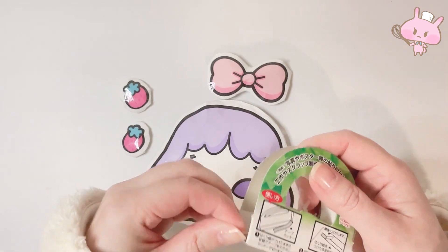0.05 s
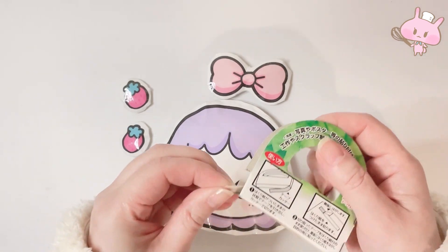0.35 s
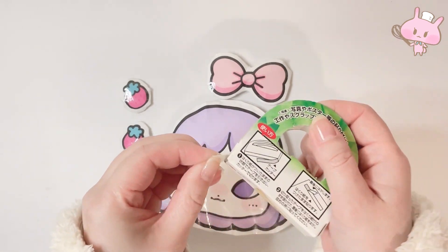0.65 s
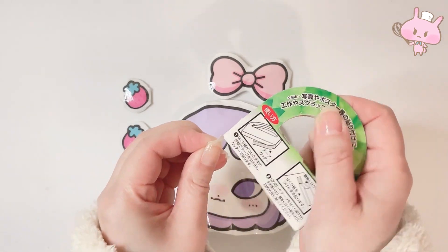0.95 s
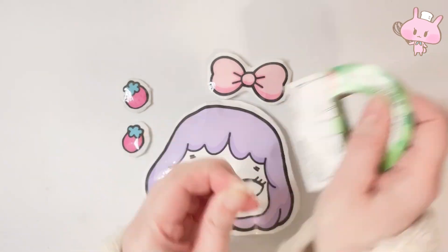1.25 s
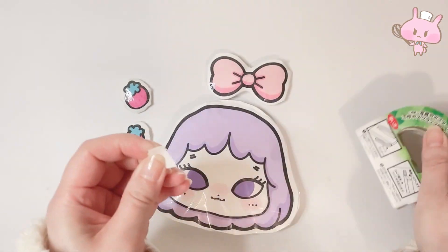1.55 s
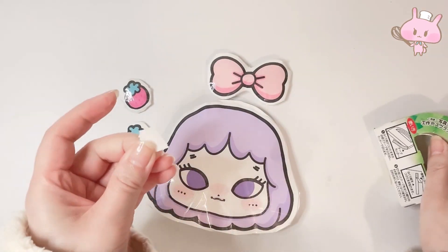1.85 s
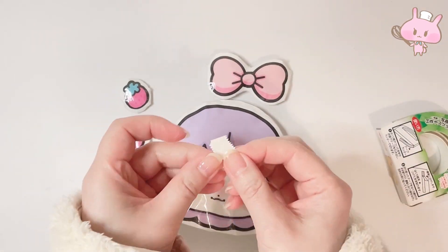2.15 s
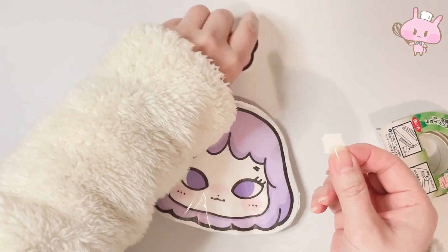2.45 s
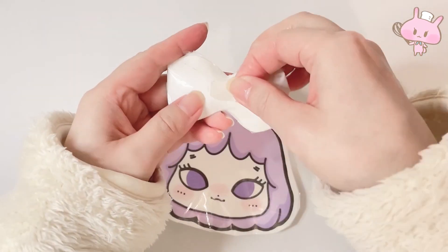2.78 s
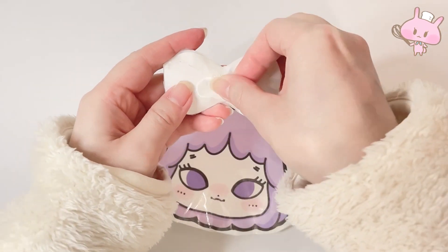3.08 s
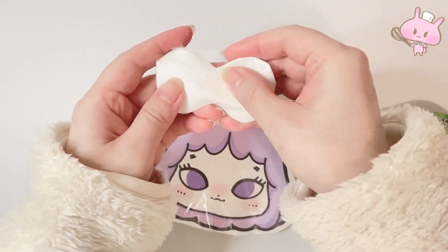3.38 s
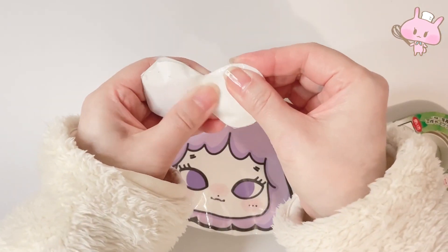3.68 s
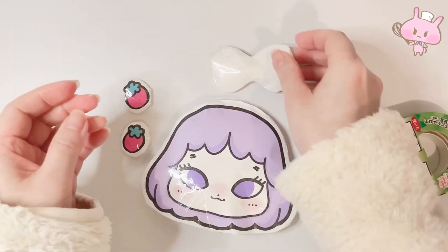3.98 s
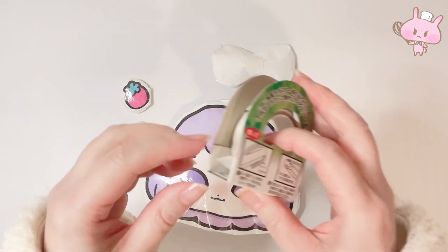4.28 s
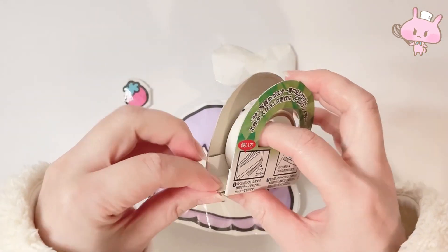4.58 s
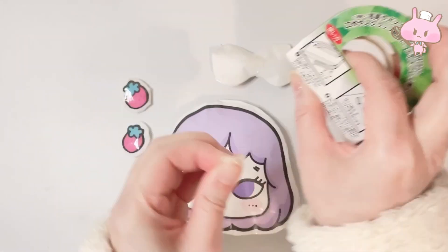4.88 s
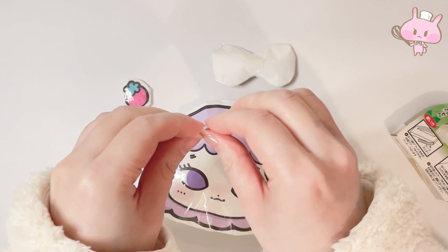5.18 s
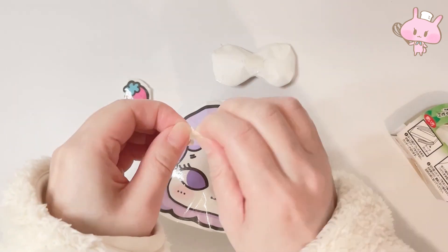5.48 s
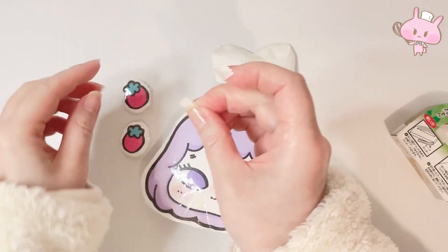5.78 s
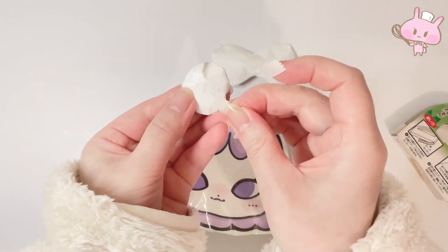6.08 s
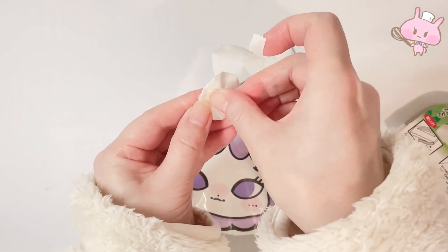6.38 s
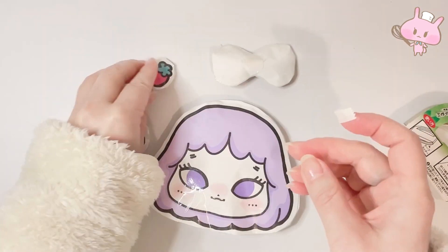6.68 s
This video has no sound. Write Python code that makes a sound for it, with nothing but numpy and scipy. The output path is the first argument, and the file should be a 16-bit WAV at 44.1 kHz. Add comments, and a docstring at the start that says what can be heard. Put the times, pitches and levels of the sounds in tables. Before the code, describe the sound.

Close up in a small, quiet room, clear tape peels off its reel with short squeaks and ticks during the first second, over a faint, low throbbing hum. At about 1.2 seconds it tears across the teeth of a plastic dispenser with a hard snap, the loudest sound, and the shell rings briefly. The dispenser scrapes and clacks onto the table around 1.6 seconds; the hum stops just before 2. Fingers tap and rustle a paper cut-out near 2.5 seconds, followed by sparse, faint crinkles and dull brushes of sleeves and wrists. From about 4.2 seconds the dispenser is handled again and a second strip rasps out in small jerks, tearing off more lightly near 4.9. A few plastic clicks follow. From 6 seconds the paper rustles and ticks as it is taped, then it is laid back and softly patted down near 6.9.

```python
"""Crafting at a table, close up. Over a low throbbing hum, clear tape sticks and slips off its reel,
then snaps hard across the teeth of a plastic dispenser, whose shell rings. The dispenser clacks down,
the hum stops just before two seconds, and the small room is very quiet. Paper cut-outs rustle and
tick as they are picked up. A second strip rasps out and tears off lightly near five seconds; the
paper is taped, laid back and patted down."""
import sys
import numpy as np
from scipy import signal
from scipy.fft import rfft, irfft
from scipy.io import wavfile

SR = 44100
rng = np.random.default_rng(int(sys.argv[2]) if len(sys.argv) > 2 else 0)


def generate_wav(signal):
    """Clip the signal to [-1, 1] and save it as 16-bit WAV at the path in sys.argv[1]."""
    frames = np.transpose(np.atleast_2d(signal))
    scaled = np.clip(frames, -1, 1) * 32767
    pcm = np.round(scaled).astype(np.int16)
    wavfile.write(sys.argv[1], SR, pcm)


N = 306054
TIME = np.arange(N) / SR
STROKE_RISE = .42  # share of a stroke's length spent swelling


def amp(db):
    """Decibels to gain."""
    return 10 ** (np.asarray(db) / 20)


def unit(x):
    """Scales to an rms of one."""
    return x / np.sqrt(np.mean(x ** 2) + 1e-20)


def curve_at(points, hz):
    """Joins (hz, value) points on a log-frequency axis."""
    point_hz, value = np.transpose(points)
    return np.interp(np.log(hz + 1), np.log(point_hz + 1), value)


def fader(points):
    """Rides a level through (time_s, level_db) points."""
    return np.interp(TIME, *np.transpose(points))


def add(mix, start_s, sound):
    """Lays a sound into the mix."""
    start = round(start_s * SR)
    sound = sound[max(-start, 0):]
    part = mix[max(start, 0):][:len(sound)]
    part += sound[:len(part)]


def eq_response(spectrum, peaks=(), tone=None, size=4096):
    """Minimum-phase impulse response of an EQ curve, with resonant peaks and a broad tone on top."""
    hz = abs(np.fft.fftfreq(size, 1 / SR))
    db = curve_at(spectrum, hz)
    db += sum(gain_db / (1 + (2 * (hz - centre) / width) ** 2) for centre, width, gain_db in peaks)
    if tone is not None:
        db += curve_at(tone, hz)
    log_gain = np.log(amp(db) + 1e-6)
    return np.fft.ifft(np.exp(np.conj(signal.hilbert(log_gain)))).real


def coloured(x, spectrum, peaks=()):
    """Gives white sound a spectrum and keeps its power."""
    impulse = eq_response(spectrum, peaks)
    return signal.oaconvolve(x, impulse / np.linalg.norm(impulse))[:N]


def drift(top_hz):
    """Slow random wander of rms one."""
    rates = np.geomspace(top_hz / 10, top_hz, 20)
    t = TIME[::100]
    wander = np.sin(2 * np.pi * (rates[:, None] * t + rng.random((20, 1)))).sum(0)
    return unit(np.interp(TIME, t, wander))


def swelling(rise_s, fall_s):
    """Times around a peak, and a gain that grows to it and dies away."""
    t = np.arange(-5 * rise_s, 6 * fall_s, 1 / SR)
    return t, np.exp(np.where(t < 0, t / rise_s, -t / fall_s))


def slips(samples, per_s, spread_db, hiss):
    """Stick and slip: tiny clicks of uneven size over a smooth hiss."""
    size, chance = rng.random((2, samples))
    sign = rng.choice([-1, 1], samples)
    click_db = -spread_db * np.log(np.maximum(size, .02))
    clicks = sign * amp(click_db) * (chance < per_s / SR)
    return unit(unit(clicks) + hiss * rng.standard_normal(samples))


def burst(peak_s, rise_s, fall_s, db, grain):
    """Start time and sound of a swelling run of slips; grain is (per_s, spread_db, hiss)."""
    t, swell = swelling(rise_s, fall_s)
    friction = unit(swell * slips(len(t), *grain))
    return peak_s + t[0], amp(db) * friction * np.sqrt(np.mean(swell ** 2))


def strokes(rows, spectrum, peaks, grain, ring_db, ring_q, bass_db, mid_db, bass_tilt, mid_tilt,
            rise_share=STROKE_RISE):
    """Each touch excites the material and one resonance; the tilts give duller touches more body."""
    out = np.zeros(N)
    for peak_s, length_s, db, bright_db, ring_hz in rows:
        tone = [(420, bass_db - bass_tilt * bright_db), (1300, mid_db - mid_tilt * bright_db),
                (3500, 0.0022), (9000, bright_db)]
        ring = (ring_hz, ring_hz / ring_q, ring_db)
        start_s, slip = burst(peak_s, rise_share * length_s, (1 - rise_share) * length_s, db, grain)
        add(out, start_s, signal.fftconvolve(slip, eq_response(spectrum, [*peaks, ring], tone)))
    return out


# room tone EQ: freq_hz, gain_db
AIR_EQ = [(12, -39.5), (20, -5.5), (86, -3.5), (142, 1.5), (210, -2.5), (357, -13), (624, -12.5),
          (1530, -20), (2600, -24), (3840, -34.5), (9400, -52.5), (11400, -39), (13500, -50.5),
          (14700, -40.5), (16000, -43.5)]
# faint resonances in the air: pitch_hz, width_hz, gain_db
AIR_PEAKS = [(748, 24, 2.5), (2580, 130, 6)]
def air(level_db=-64.66):
    """The still air of the room: a steady bed of dark noise."""
    return amp(level_db) * coloured(rng.standard_normal(N), AIR_EQ, AIR_PEAKS)


# reverb time: freq_hz, t60_s
ROOM_DECAY = [(200, 0.22), (1500, 0.22), (5000, 0.19), (14000, .16)]
def room(send, predelay_s=0.0044):
    """A small room: dense reflections, the treble dying first."""
    hz, t, noise = signal.stft(rng.standard_normal(SR // 2), SR, nperseg=256)
    decay = 1e-3 ** (t / curve_at(ROOM_DECAY, hz)[:, None])
    tail = signal.istft(noise * decay, SR, nperseg=256)[1]
    tail = np.r_[np.zeros(round(predelay_s * SR)), tail]
    return signal.fftconvolve(send, tail / np.linalg.norm(tail))[:N]


# fader ride of the drone: time_s, level_db
HUM_RIDE = [(0, -50), (.58, -45.5), (.88, -49.5), (1.1, -45), (1.62, -45), (1.75, -40), (1.9, -55)]
# its partials: pitch_hz, gain_db
HUM_PARTIALS = [(55, 2.5), (82, -16), (162, -15.5), (205, -20.5)]
# EQ of the rumble around it: freq_hz, gain_db
RUMBLE_EQ = [(20, -30), (42, -4), (60, 6), (100, -7), (170, -7), (300, -18), (600, -29), (1500, -27),
             (4000, -41), (16000, -68)]
def hum(throb_hz=6.15, throb_db=3.5, crest_s=.115, flutter_db=1.84, waver=0.039,
        trim_db=-1, rumble_db=-52, end_s=1.88, fade_s=0.0077):
    """A throbbing, wavering low drone in a bed of rumble that stops together with it."""
    partials = np.zeros(N)
    for hz, db in HUM_PARTIALS:
        gain = amp(db + flutter_db * drift(7.1))
        pitch_hz = hz * (1 + waver * drift(9.9))
        partials += gain * np.sin(2 * np.pi * np.cumsum(pitch_hz) / SR)
    throb = np.cos(2 * np.pi * throb_hz * (TIME - crest_s))
    drone = amp(fader(HUM_RIDE) + throb_db * throb + trim_db) * unit(partials)
    rumble = amp(rumble_db) * coloured(rng.standard_normal(N), RUMBLE_EQ)
    return (drone + rumble) * np.clip((end_s - TIME) / fade_s, 0, 1)


# fader ride of the forearms: time_s, level_db
ARMS_RIDE = [(0, -79.5), (1.7, -61), (1.92, -58.5), (2.8, -63), (4.6, -62), (6.1, -74), (6.94, -64)]
# their bass-heavy EQ: freq_hz, gain_db
ARMS_EQ = [(20, -12.5), (55, 1.5), (95, -6.5), (135, 2), (240, -6.5), (380, -22.5), (700, -19), (1500, -27),
           (16000, -66.5)]
def arms(lumps_db=2):
    """Sleeved forearms drag on the table in dull lumps."""
    level_db = fader(ARMS_RIDE) + lumps_db * drift(14)
    return amp(level_db) * coloured(rng.standard_normal(N), ARMS_EQ)


# fader ride of fingers and sleeves: time_s, level_db
BRUSH_RIDE = [(0.0, -77.5), (0.23, -74.5), (0.67, -74), (1.1, -66.5), (1.55, -64.5), (1.64, -66),
              (1.97, -81.5), (3.77, -77.5), (4.62, -76), (5.18, -82), (6.38, -81), (6.94, -77)]
# their mid-forward EQ: freq_hz, gain_db
BRUSH_EQ = [(300, -3), (900, 3), (1600, 5.5), (2400, 0), (4000, -0.5), (9000, -6.5), (11500, -8.5),
            (13000, -14.5), (15500, -9.5)]
def brushing(flutter_db=2, trim_db=1):
    """Faint uneven friction of skin and fleece."""
    level_db = fader(BRUSH_RIDE) + trim_db + flutter_db * drift(30)
    return amp(level_db) * coloured(slips(N, per_s=820, spread_db=3, hiss=1.0), BRUSH_EQ)


# the dispenser's recoil, then the table's boom once it is down: start_s, level_db, pitch_hz, decay_s
RECOIL_AND_BOOM = [(1.222, -37, 270.6, 0.0166), (1.235, -30, 308.6, 0.0105), (1.2362, -15.5, 798, 0.00453),
                   (1.985, -47, 129.9, 0.1)]
# fingers patting a cut-out onto the table: start_s, level_db
FINGER_PATS = [(2.419, -35.5), (2.457, -27.5), (2.478, -32), (2.505, -30), (2.517, -23.5), (2.523, -31),
               (5.957, -42), (6.904, -35.5)]
# wrists landing on the table: start_s, level_db
WRIST_THUMPS = [(2.222, -43), (3.86, -45.5), (4.044, -40.5), (4.25, -48), (4.746, -43.5), (5.275, -47.5),
                (6.472, -47)]
def bumps(attack_s=0.002081, pat_hz=381, pat_decay_s=0.0073, thump_hz=73, thump_decay_s=0.013):
    """Soft contacts and recoils give a few low, damped swings."""
    t, out = np.arange(SR // 4) / SR, np.zeros(N)
    pats = [(start_s, db, pat_hz, pat_decay_s) for start_s, db in FINGER_PATS]
    thumps = [(start_s, db, thump_hz, thump_decay_s) for start_s, db in WRIST_THUMPS]
    for start_s, db, hz, decay_s in RECOIL_AND_BOOM + pats + thumps:
        envelope = (1 - np.exp(-t / attack_s)) * np.exp(-t / decay_s)
        add(out, start_s, amp(db) * envelope * np.sin(2 * np.pi * hz * t))
    return out


# EQ of friction on paper: freq_hz, gain_db
PAPER_EQ = [(100, -15.5), (350, -5.5), (5000, -2.5), (11300, -11.5), (12500, -18.5), (15500, -14.5)]
# paper moves: peak_s, length_s, level_db, brightness_db, ring_hz
PAPER_RUSTLES = [(1.936, 0.0098, -35, -7, 1156), (1.949, .012, -37, -8, 1000),
                 (2.421, .012, -43, -12, 3400), (2.436, .022, -46, -14, 3400),
                 (2.485, 0.065, -43.5, -15.5, 975), (2.528, .02, -42.5, -22, 554),
                 (2.618, 0.024, -54, 5.5, 5150), (2.734, .01, -57.5, 4, 2743),
                 (3.254, .017, -53.5, 3.5, 1020), (3.455, 0.043, -63.5, 6.5, 4480),
                 (3.535, .018, -63, 5, 1560), (3.84, .026, -58, 5, 1053), (3.945, 0.016, -59, -4, 3500),
                 (4.083, 0.018, -59, 0, 1072), (5.397, 0.019, -62, 4.5, 2140), (5.58, .016, -55, 15, 11200),
                 (5.965, .025, -40, -12.5, 1040), (6.364, 0.019, -45, 0.5, 1970),
                 (6.493, .022, -56.5, 10.5, 3330), (6.724, .02, -48.5, -9, 3230),
                 (6.767, .026, -45.5, -6, 3140), (6.886, 0.036, -54.5, -21, 4250)]
def rustles():
    """Paper and loose tape slide under the fingers in short, grainy swells."""
    return strokes(PAPER_RUSTLES, PAPER_EQ, (), grain=(1800, 3, .9), ring_db=9, ring_q=4.9,
                   bass_db=8.5, mid_db=2, bass_tilt=0.8, mid_tilt=0.037)


# crisp paper and tape ticks: peak_s, level_db, brightness_db, ring_hz
PAPER_TICKS = [(0.7549, -43.5, 17.5, 1637), (1.0397, -42, 11, 5400), (1.4962, -41, 9.5, 1070),
               (1.539, -35.5, -6, 3700), (1.742, -41, 14.5, 6550), (2.4569, -34.5, -11, 3345),
               (3.229, -41.5, -5.5, 1039), (3.494, -48.5, 3, 5070), (3.577, -54, -8, 1420),
               (3.882, -48, -7.5, 2500), (4.012, -57, 9, 2330), (4.083, -49.5, -7, 1137),
               (4.376, -43.5, -7, 2440), (4.434, -48.5, 6, 1587), (4.511, -46.5, 3, 7400),
               (5.355, -54, -4, 2651), (6.3632, -37.5, 0, 1990), (6.4981, -43, 11, 3350),
               (6.723, -37, -14.5, 3160), (6.7738, -31, -7, 3270)]
def ticks(length_s=0.0019, faint_db=-57.5, spread_db=5, low_hz=1000, high_hz=5000):
    """Creases pop and tape lets go of a fingertip; fainter ticks fall by chance in the second half."""
    faint = []
    for when, size, pitch in rng.random((9, 3)):
        peak_s = np.interp(when, (0, 1), (3.4, 7.7))  # some may fall past the end
        db = faint_db + spread_db * (2 * size - 1)
        faint.append((peak_s, db, 0, low_hz * (high_hz / low_hz) ** pitch))
    rows = [(peak_s, length_s, *voice) for peak_s, *voice in PAPER_TICKS + faint]
    return strokes(rows, PAPER_EQ, (), grain=(8000, 3, .7), ring_db=8.5, ring_q=6.7,
                   bass_db=3.5, mid_db=2, bass_tilt=.4, mid_tilt=0.16, rise_share=.13)


# EQ of friction on the dispenser: freq_hz, gain_db
PLASTIC_EQ = [(100, -7.5), (350, -8.5), (5000, -3), (11300, -9), (12500, -19.5), (15500, -12.5)]
# its resonances, damped by the hand: pitch_hz, width_hz, gain_db
HELD_PEAKS = [(1290, 49, 9), (1740, 97, 6), (3180, 240, 6.5), (4100, 340, 4)]
# tape pulls and dispenser slides: peak_s, length_s, level_db, brightness_db, ring_hz
TAPE_PEELS = [(0.145, .08, -53.5, 3, 3300), (0.238, 0.044, -40.5, -2, 3430), (0.775, 0.037, -51, 6.5, 1580),
              (0.93, 0.078, -50, -2.5, 3500), (1.0, 0.074, -54.5, 1, 1610), (1.085, 0.075, -63, 13.5, 5600),
              (1.19, 0.072, -59.5, 15.5, 1604), (1.548, 0.05, -34.5, -3, 1220),
              (1.582, 0.035, -42, -4, 1210), (1.768, .04, -41, 2, 1238), (4.187, 0.03, -48, -18.5, 3412),
              (4.264, .015, -36.5, -13, 2020), (4.279, 0.013, -37, -11.5, 2400),
              (4.385, 0.026, -59, -5, 4550), (4.448, 0.023, -65.5, 6.5, 4610), (4.511, 0.01, -54, -2, 7600),
              (4.55, 0.049, -61, -4, 7000), (4.662, 0.017, -47, -11, 2200),
              (4.702, 0.02, -49.5, -9.5, 3160), (4.743, 0.025, -45.5, -10, 2200),
              (4.763, 0.02, -48, -3, 3300), (5.012, .02, -64, 5, 9000), (5.062, 0.016, -42.5, -6, 8950),
              (5.083, .01, -35, -4, 2163), (5.094, .016, -38, -11, 3440)]
def peels():
    """Tape unrolls and the dispenser slides in the hand or on the table, colouring the friction."""
    return strokes(TAPE_PEELS, PLASTIC_EQ, HELD_PEAKS, grain=(2000, 3.3, .8), ring_db=12, ring_q=7.2,
                   bass_db=-1, mid_db=-1, bass_tilt=0.15, mid_tilt=0.082)


# tape singing as it drags on its reel: peak_s, length_s, level_db, pitch_hz, width_hz
REEL_SQUEAKS = [(.169, .085, -60, 1680, 300), (0.222, .034, -45, 1542, 300), (.233, .037, -43.5, 3400, 480),
                (0.247, 0.022, -35.5, 1301, 70), (.25, .04, -59, 636, 100), (.935, .075, -61, 4280, 1600),
                (.98, .15, -61, 1610, 220), (1.0405, .004, -40, 5490, 900), (1.553, .04, -43.5, 1216, 200)]
# the second strip rasping off in jerks: peak_s, length_s, level_db
STRIP_RASPS = [(4.511, 0.017, -56), (4.549, .02, -61.5), (4.585, 0.019, -68.5), (4.662, 0.015, -62),
               (4.702, .022, -59), (4.748, .03, -58)]
def squeaks(rasp_hz=8000, fall_hz_per_s=7000, rasp_width_hz=2000):
    """Stick and slip locks onto one resonance: a grainy whistle that swells and fades."""
    out, bins_hz = np.zeros(N), np.fft.rfftfreq(SR, 1 / SR)
    first_s = STRIP_RASPS[0][0]
    # each rasp is lower than the last as the free strip lengthens
    rasps = [(peak_s, length_s, db, rasp_hz - fall_hz_per_s * (peak_s - first_s), rasp_width_hz)
             for peak_s, length_s, db in STRIP_RASPS]
    for peak_s, length_s, db, hz, width_hz in REEL_SQUEAKS + rasps:
        t, swell = swelling(STROKE_RISE * length_s, (1 - STROKE_RISE) * length_s)
        drive = slips(SR, per_s=1500, spread_db=5, hiss=.7)
        resonance = 1 / (1 + (2 * (bins_hz - hz) / width_hz) ** 2)
        whistle = np.resize(irfft(rfft(drive) * resonance), len(t))
        add(out, peak_s + t[0], amp(db) * unit(swell * whistle) * np.sqrt(np.mean(swell ** 2)))
    return out


# hard plastic hits: peak_s, length_s, level_db, brightness_db, ring_hz
SHELL_CLACKS = [(0.589, .009, -56, -21, 1750), (1.498, 0.01, -46.5, -1, 1060), (1.669, .0055, -29, 3, 1410),
                (1.6844, .015, -35.5, -3, 1530), (4.171, 0.0017, -46, -7, 1454)]
def clacks():
    """The dispenser's shell strikes the table or a fingernail with a sharp attack."""
    return strokes(SHELL_CLACKS, PLASTIC_EQ, HELD_PEAKS, grain=(6000, 3, .8), ring_db=10.5, ring_q=4.3,
                   bass_db=16, mid_db=17.5, bass_tilt=0.073, mid_tilt=.05, rise_share=.05)


# modes of the dispenser: pitch_hz, gain_db, t60_s
SHELL_MODES = [(240, -20, .15), (832, -11, .1), (1066, -8, .1), (1203, -4, .13), (1255, -6, .13),
               (1471, -1, .1), (1580, 0, .11), (1671, -7, .12), (1905, -9, .12), (2282, -3, .09),
               (2521, -9, .13), (2839, -9, .09), (3121, -8, .1), (3260, -10, .11), (4210, -7, .08),
               (4930, -9, .09), (6527, -14, .09), (7671, -14, .09)]
def shell_ring(coupling_db=-19.5):
    """The plastic shell rings with each spurt of the hard tear and with each clack."""
    t, out = np.arange(SR // 2) / SR, np.zeros(N)
    ring = sum(amp(db) * 1e-3 ** (t / t60_s) * np.sin(2 * np.pi * (hz * t + rng.random()))
               for hz, db, t60_s in SHELL_MODES)
    knocks = [(peak_s, db) for peak_s, _, _, db in HARD_SPURTS]
    knocks += [(peak_s, db) for peak_s, _, db, _, _ in SHELL_CLACKS]
    for start_s, db in knocks:
        add(out, start_s, amp(db + coupling_db) * ring)
    return out


# the two tears, a hard pull and a light one: peak_s, rise_s, fall_s, level_db
HARD_SPURTS = [(1.2112, 0.0049, 0.004, -26), (1.2173, 0.0019, 0.0073, -18), (1.223, .002, 0.00304, -19.5),
               (1.2297, .002, 0.0038, -20), (1.2347, .0004, 0.0046, -11), (1.2373, .0007, .0011, -2.5),
               (1.2405, 0.000389, .003, -16), (1.263, 0.0084, 0.02, -29.5)]
LIGHT_SPURTS = [(4.926, 0.0044, 0.0088, -28), (4.9332, 0.002, 0.0052, -23), (4.9405, 0.0037, 0.0062, -33)]
# EQ of each tear: freq_hz, gain_db
HARD_EQ = [(70, -55), (120, -31), (290, -11), (400, -21), (580, -22.5), (820, -14.5), (1200, -3),
           (1580, -1.5), (1950, -12.5), (2300, -7), (3900, -12), (4850, -9.5), (6900, -18.5), (7700, -16),
           (11400, -24.5), (12400, -29), (15500, -23)]
LIGHT_EQ = [(150, -43.5), (350, -35), (460, -12), (580, -22.5), (920, -5.5), (1250, -11), (1850, -11),
            (2250, -5), (3100, -1.5), (3500, -12.5), (5100, -7), (11000, -21.5), (12300, -29.5),
            (15500, -27.5)]
def tear(spurts, spectrum, grain):
    """The tape gives way tooth by tooth in a few quick spurts."""
    out = np.zeros(N)
    for spurt in spurts:
        add(out, *burst(*spurt, grain))
    return coloured(out, spectrum)


def scene():
    """Tape, dispenser and paper up close, over the hum and the air of the room."""
    hard = tear(HARD_SPURTS, HARD_EQ, grain=(9000, 2, .8))
    light = tear(LIGHT_SPURTS, LIGHT_EQ, grain=(6000, 2.5, .9))
    handling = peels() + clacks() + rustles() + ticks() + shell_ring() + squeaks() + bumps() + brushing()
    # the hard snap fills the room; the light one stays close and dry
    reverb = room(amp(-15) * hard + amp(-27.5) * light + amp(-18) * handling)
    return (hard + light + handling + reverb + air() + arms() + hum())[None]


def record(dry):
    """A soft clip rounds off the loudest snap near full scale; a low-pass trims the very top."""
    ceiling, cutoff_hz = .95, 15900
    rounded = dry / (1 + (dry / ceiling) ** 6) ** (1 / 6)
    lowpass = signal.firwin(511, cutoff_hz, window=("kaiser", 9), fs=SR)
    return signal.oaconvolve(rounded, lowpass[None], "same")


dry = scene()
out = record(dry)
generate_wav(out)
```